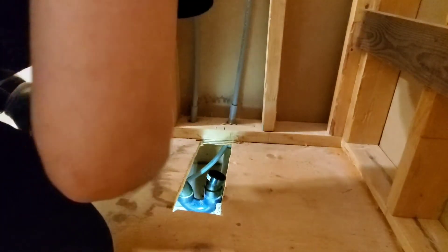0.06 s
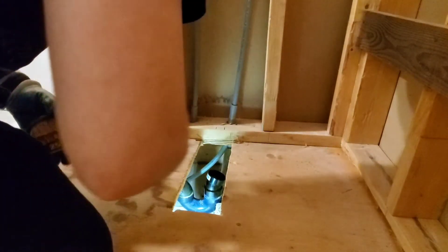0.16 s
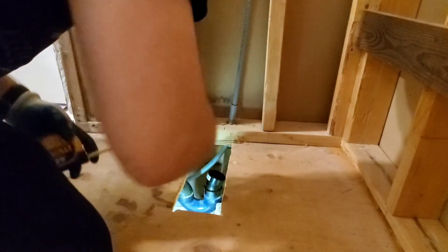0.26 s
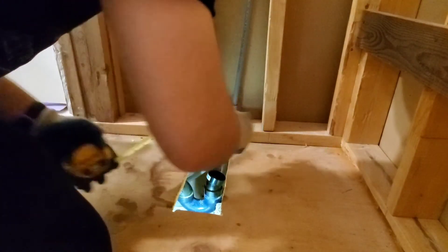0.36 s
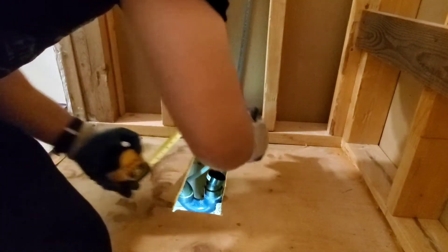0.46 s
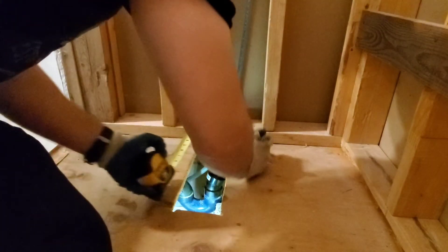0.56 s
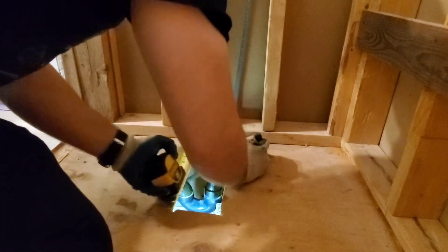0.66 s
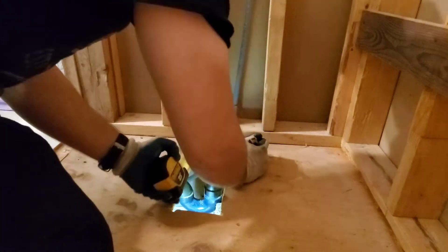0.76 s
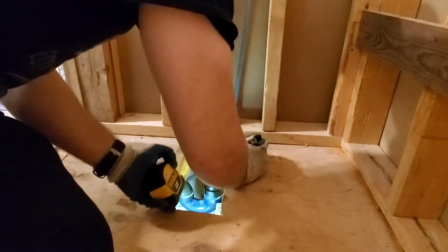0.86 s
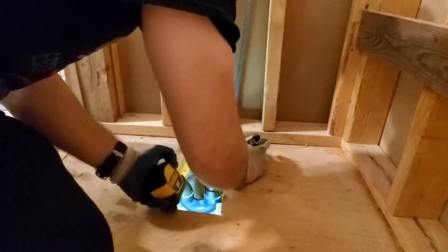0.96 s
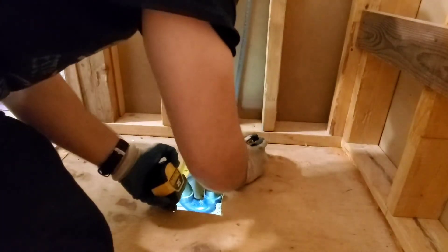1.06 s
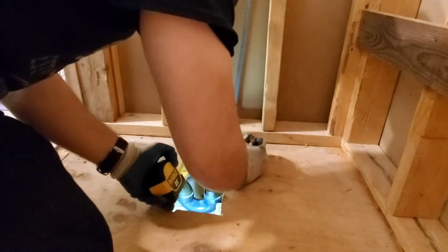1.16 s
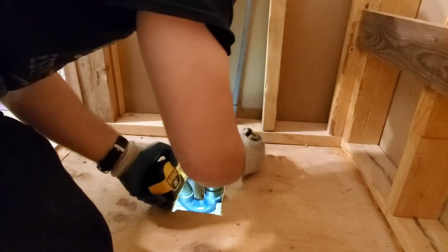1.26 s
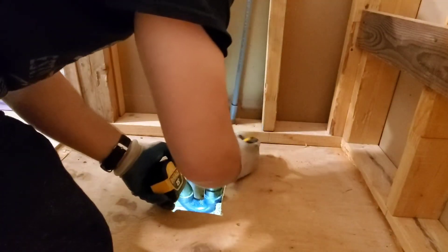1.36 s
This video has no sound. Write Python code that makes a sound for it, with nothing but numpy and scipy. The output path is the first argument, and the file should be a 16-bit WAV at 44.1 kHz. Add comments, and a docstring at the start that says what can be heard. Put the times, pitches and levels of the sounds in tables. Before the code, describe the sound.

A steel tape measure hisses out, then clicks and knocks against a plastic pipe.

```python
"""Over a low rumble and a soft rub of gloves, a steel tape measure hisses out of its case, close to
a pair of microphones in a bare timber-framed room. Friction makes the blade sing and drone, and it
buckles with a hollow bonk. Case and blade click, knock and ping on a plastic drain pipe and its
fitting, hands thump on the plywood floor, and the gloves rub on as the tape is held in place."""
import sys
import numpy as np
from scipy import signal
from scipy.fft import rfft, irfft
from scipy.io import wavfile

SR = 44100
rng = np.random.default_rng(int(sys.argv[2]) if len(sys.argv) > 2 else 0)


def bounce(signal):
    """Save signal as a 16-bit WAV file at the path given by the first command-line argument."""
    frames = np.transpose(np.atleast_2d(signal))
    limited = np.clip(frames, -1, 1)
    pcm = np.round(limited * 32767).astype(np.int16)
    wavfile.write(sys.argv[1], SR, pcm)


N = 63945
T = np.arange(N) / SR

# friction level of the blade leaving the case, following its speed (t/s, level/dB)
PULL = [(0, -67.5), (.075, -76.5), (.105, -52), (.15, -51.5), (.21, -45.5), (.26, -43.5), (.30, -41),
        (.375, -37), (.41, -43.5), (.465, -52), (.50, -80), (.56, -70), (.61, -60.5), (.66, -100)]
SLIDE_SLIPS_PER_S, SLIDE_SPREAD_DB = 4300, 0.5


def from_db(db):
    """Decibels to gain."""
    return 10 ** (np.asarray(db) / 20)


def unit_rms(x):
    """Scale to unit level."""
    return x / np.sqrt(np.mean(x ** 2) + 1e-20)


def level_curve(rows):
    """Gain that follows points of (t/s, level/dB)."""
    return from_db(np.interp(T, *np.transpose(rows)))


def at_hz(points, hz):
    """Read a table on a log-frequency axis."""
    f, value = np.transpose(points)
    return np.interp(np.log(hz + 1e-3), np.log(f), value)


def pan(db):
    """Microphone gains, the left one db above the right."""
    return from_db(np.array([[db], [-db]]) / 2)


def band(x, low_hz, high_hz, order=2):
    """Causal band-pass."""
    sos = signal.butter(order, [low_hz, min(high_hz, SR / 2 - 500)], "band", fs=SR, output="sos")
    return signal.sosfilt(sos, x)


def colour(x, spectrum, resonances=()):
    """Give an excitation a broad spectrum and a few resonances, at unit level."""
    hz = np.arange(N + 1) * SR / (2 * N)
    peaks_db = sum(db / (1 + (2 * (hz - f) / width) ** 2) for f, width, db in resonances)
    gain = from_db(at_hz(spectrum, hz) + peaks_db)
    return unit_rms(irfft(rfft(x, 2 * N) * gain)[..., :N])


def swell(middle, half_length, db):
    """Envelope that rises and falls smoothly."""
    return from_db(db) * np.exp(-((T - middle) / half_length) ** 2)


def decay(start, t60):
    """Envelope that jumps to one and dies away."""
    return (T >= start) * from_db(-60 * np.maximum(T - start, 0) / t60)


def crack(start, rise_s=0.0011, hold_s=0.003, t60_s=0.0093):
    """Envelope of one contact: quick rise, brief hold, fast release."""
    attack = np.clip((T - start) / rise_s, 0, 1)
    return attack * from_db(-60 * np.maximum(T - start - hold_s, 0) / t60_s)


def strike(start, modes):
    """Damped sines set off by one blow."""
    return sum(from_db(db) * decay(start, t60) * np.sin(2 * np.pi * hz * (T - start))
               for hz, db, t60 in modes)


def friction(slips_per_s, spread_db):
    """Dense tiny slips of uneven size, as each microphone gets them."""
    sizes = from_db(spread_db * np.minimum(rng.exponential(1, N), 4))
    slips = rng.random(N) < slips_per_s / SR
    return slips * sizes * rng.standard_normal((2, N))


def room(x, wet_db, gap_s=0.0011):
    """Add diffuse reflections from nearby studs and boards; the treble dies first."""
    # reverberation time of the bare room (f/Hz, t60/s)
    reverb_times = [(200, 0.47), (1000, 0.44), (3500, 0.34), (8000, 0.29), (15000, 0.32)]
    edges_hz = np.geomspace(180, 18000, 8)
    tail = 0
    for low, high in zip(edges_hz, edges_hz[1:]):
        t60 = at_hz(reverb_times, np.sqrt(low * high))
        tail += band(rng.standard_normal((2, N)), low, high) * decay(gap_s, t60)
    tail /= np.sqrt(np.sum(tail ** 2, axis=1, keepdims=True))
    return x + from_db(wet_db) * signal.fftconvolve(x, tail, axes=1)[:, :N]


def room_tone(side_db=1.5):
    """Low rumble of the building and faint hiss, wide across the pair."""
    # spectrum of the room tone (f/Hz, level/dB)
    spectrum = [(20, 4), (45, -12), (70, 5.5), (90, -3), (125, -11.5), (250, -18), (1000, -37), (4000, -50),
                (15000, -44)]
    # rise and fall of the rumble (t/s, level/dB)
    rumble = [(0, -71), (.1, -66.5), (.2, -55), (.5, -54.5), (.9, -66.5), (1.3, -68), (1.45, -48)]
    mid, side = colour(rng.standard_normal((2, N)), spectrum)
    return level_curve(rumble) * (mid + from_db(side_db) * side * [[1], [-1]])


def gloves():
    """Fabric rubs softly on the plastic of case and pipe, left of centre."""
    # rubbing level, following the pressure of the hands (t/s, level/dB)
    pressure = [(0, -58.5), (.06, -70), (.12, -70.5), (.25, -69), (.45, -53), (.58, -99), (.75, -54),
                (.86, -66), (.94, -60), (1.0, -48), (1.12, -44.5), (1.18, -57), (1.28, -50.5),
                (1.34, -60.5), (1.41, -60), (1.45, -69)]
    # spectrum of the rubbing (f/Hz, level/dB)
    spectrum = [(100, 12.5), (200, 4.5), (420, 6), (800, 0), (1400, -1), (3200, -4.5), (5000, -11),
                (8000, -21.5), (15000, -13)]
    # its low resonances (f/Hz, width/Hz, boost/dB)
    resonances = [(164, 59, 6.3), (354, 11, 12.8), (417, 24, 3.8)]
    rub = colour(friction(slips_per_s=2500, spread_db=-1.5), spectrum, resonances)
    return rub * level_curve(pressure) * pan(db=6.5)


def blade_slide():
    """The blade scrapes through the mouth of the case, and later shifts a little on the pipe."""
    # spectrum of the sliding steel (f/Hz, level/dB)
    spectrum = [(150, -27), (450, -9), (900, -2), (1400, -1), (2300, 3), (3500, 2.5), (4700, 0), (6000, -1),
                (8000, -6.5), (12500, 1.5), (15500, -3.5)]
    # brief shifts against the pipe (t/s, half length/s, level/dB)
    shifts = [(1.032, 0.05, -52), (1.279, 0.052, -58), (1.375, 0.021, -61)]
    level = level_curve(PULL) + sum(swell(*shift) for shift in shifts)
    scrape = colour(friction(SLIDE_SLIPS_PER_S, SLIDE_SPREAD_DB), spectrum) * level
    lows = signal.sosfilt(signal.butter(1, 3500, fs=SR, output="sos"), scrape)
    scrape += lows * (pan(db=5) - 1.5)  # the lows thin out, mostly at the right microphone
    return room(scrape * pan(db=1), wet_db=-2.5)


def blade_sings():
    """Friction excites one narrow resonance after another as the free length of the blade grows."""
    # passing resonances (t/s, half length/s, f/Hz, width/Hz, level/dB relative to the scrape)
    resonances = [(0.1, 0.16, 3150, 370, -3), (0.19, 0.08, 2120, 150, -7), (0.306, 0.023, 2900, 820, 1),
                  (0.4, 0.058, 3320, 200, -9.5), (0.371, 0.012, 5330, 120, -6)]
    singing = 0
    for t, half_length, hz, width, db in resonances:
        ring = band(friction(SLIDE_SLIPS_PER_S, SLIDE_SPREAD_DB), hz - width / 2, hz + width / 2)
        singing += unit_rms(ring) * swell(t, half_length, db)
    return singing * level_curve(PULL) * pan(db=5.5)


def fitting_clicks(shared_power=0.15, right_lag_samples=4):
    """Blade and case tick on the fitting: cracks of a few milliseconds, each with its own brightness."""
    # contacts (t/s, body level/dB, mid level/dB, upper level/dB, top level/dB, left over right/dB)
    contacts = [(0.084, -66.5, -61, -75, -62, 16), (0.0978, -75, -53, -51.5, -48.5, 14.5),
                (0.442, -50.5, -46, -50.5, -45, 18), (.465, -45, -38.5, -47, -49.5, 6),
                (0.515, -49, -56, -55, -44, 8.5), (.619, -57, -45, -51, -45.5, 14.5),
                (0.6327, -37, -36, -40.5, -36, 7.5), (.788, -58, -43, -38, -35.5, 11),
                (0.882, -62.5, -55.5, -48, -60, 21), (0.887, -58, -44.5, -44, -43, 7),
                (.969, -75, -47.5, -50.5, -47.5, 11.5), (0.985, -71, -48, -70, -48.5, 4),
                (1.023, -71, -37.5, -37, -31, 10.5), (1.046, -47, -36.5, -44, -57, 10),
                (1.0534, -48, -37.5, -34.5, -27, 9.5)]
    # body, mid, upper and top bands of a click (low f/Hz, high f/Hz)
    bands = [(350, 1800), (2300, 3900), (4200, 7300), (9000, 17000)]
    # added balance of each band (left over right/dB)
    band_pan_db = [-2.5, -1.5, -9.5, -8]
    clicks = np.zeros((2, N))
    for k, (low, high) in enumerate(bands):
        common = rng.standard_normal(N)
        noise = np.sqrt(shared_power) * np.array([common, np.roll(common, right_lag_samples)])
        noise += np.sqrt(1 - shared_power) * rng.standard_normal((2, N))
        level = sum(from_db(band_db[k]) * pan(pan_db) * crack(t) for t, *band_db, pan_db in contacts)
        clicks += unit_rms(band(noise, low, high, order=3)) * level * pan(band_pan_db[k])
    return room(clicks, wet_db=-0.5)


def blade_drone():
    """Smooth friction drives the low bending resonances of the extended blade."""
    # hollow drone as the blade bows and rubs (t/s, level/dB)
    bowing = [(0, -82), (.09, -70), (.145, -52.5), (.20, -53.5), (.29, -64.5), (.31, -43.5), (.355, -47),
              (.40, -56), (.47, -50), (.56, -95), (.62, -98)]
    # spectrum of the drone (f/Hz, level/dB)
    spectrum = [(200, -37), (330, -22), (430, 1), (700, -2.5), (950, -15), (1600, -26)]
    # bending resonances (f/Hz, width/Hz, boost/dB)
    resonances = [(373, 17, 14), (410, 23, 1), (469, 23, 5), (656, 37, 4)]
    return colour(rng.standard_normal((2, N)), spectrum, resonances) * level_curve(bowing) * pan(db=5)


def floor_thumps():
    """Soft pushes set the plywood booming; a longer contact is duller."""
    # weight coming down on the floor (t/s, level/dB, contact length/s)
    thumps = [(.175, -55, 0.0059), (0.471, -53, 0.0041), (0.627, -56, 0.0018), (0.65, -70, 0.0049),
              (.727, -54, 0.0028), (.777, -46.5, 0.0066), (0.9563, -42.5, 0.0043), (.968, -37, 0.0054),
              (0.982, -41.5, 0.0033), (1.056, -37, 0.0011), (1.066, -42, 0.003), (1.131, -47.5, 0.0043)]
    # modes of the floor (f/Hz, level/dB, t60/s)
    modes = [(67.5, 3, 0.37), (134, -14, 0.3), (160.5, -2, 0.25), (238, -7, 0.15)]
    boom = 0
    for t, db, contact_s in thumps:
        push = np.sin(np.pi * np.minimum(T / contact_s, 1))
        boom += from_db(db) * signal.fftconvolve(strike(t, modes), push / push.sum())[:N]
    return boom * pan(db=6.5)


def blade_buckles():
    """The thin curved blade snaps through with a hollow bonk, well to the left."""
    # buckles and wobbles back (t/s, level/dB, pitch ratio)
    buckles = [(.305, -30.5, 1), (.336, -41, 0.95), (.352, -42, 1), (1.061, -37.5, 0.97)]
    # modes of the buckling blade (f/Hz, level/dB, t60/s)
    modes = [(365, -12, 0.61), (426, -3, 0.092), (481, -4, 0.053), (636, -18, 0.07), (853, -9.5, 0.02)]
    bonks = 0
    for t, db, pitch in buckles:
        tuned = [(hz * pitch, level, t60) for hz, level, t60 in modes]
        bonks += from_db(db) * strike(t, tuned)
    return room(band(bonks, 375, 1840, order=3) * pan(db=10.5), wet_db=-4.5)


def sleeve_brushes():
    """Soft, low puffs of cloth as the arm moves, centred between the microphones."""
    # passes of the sleeve (t/s, half length/s, level/dB)
    brushes = [(0.33, 0.018, -58), (.365, 0.013, -50), (1.244, 0.016, -61)]
    cloth = unit_rms(band(rng.standard_normal(N), low_hz=154, high_hz=227))
    return cloth * sum(swell(*brush) for brush in brushes)


def blade_catches():
    """The blade's edge catches in the case: thin, dry ticks close to the microphones."""
    # catches of the edge (t/s, level/dB)
    catches = [(0.407, -44), (.444, -41), (.465, -43), (.5145, -37.5)]
    hiss = unit_rms(band(rng.standard_normal((2, N)), low_hz=13500, high_hz=17000))
    level = sum(from_db(db) * crack(t) for t, db in catches)
    return room(hiss * level * pan(db=8), wet_db=-19)


def pipe_knock(crack_boost_db=2.5, clatter_t60_s=0.2):
    """The plastic pipe cracks hard and rings under the case, and its fitting clatters."""
    # blow of the case on the pipe (t/s, level/dB)
    knocks = [(0.6326, -36)]
    # modes of pipe and fitting (f/Hz, level/dB, t60/s)
    modes = [(119, -26, 0.24), (216, -16, 0.13), (314, -5.5, 0.12), (732, -10, 0.23), (840, -10.5, 0.13),
             (1020, -16, 0.41), (1627, -0.5, 0.1), (2786, -3, 0.028), (3270, 0.5, 0.033), (3970, -11, 0.05)]
    # dull clatters of the fitting (t/s, level/dB)
    clatters = [(0.63, -38), (0.653, -41.5), (1.061, -37)]
    # spectrum of the clatter (f/Hz, level/dB)
    spectrum = [(80, -0.5), (125, 10), (220, -5), (370, 4.5), (520, -8.5), (830, -1.5), (1400, -11),
                (2500, -8.5), (5000, -18.5)]
    ring = sum(from_db(db) * strike(t, modes) for t, db in knocks)
    impact = unit_rms(band(rng.standard_normal(N), low_hz=3020, high_hz=3920, order=5))
    impact *= sum(from_db(db + crack_boost_db) * crack(t) for t, db in knocks)
    clatter = colour(friction(slips_per_s=4000, spread_db=-0.2), spectrum)
    clatter *= sum(from_db(db) * decay(t, clatter_t60_s) for t, db in clatters)
    return room((ring + impact + clatter) * pan(db=6), wet_db=-5)


def hook_tap():
    """The small steel hook at the end of the blade pings, with more room than direct sound."""
    # tap on the fitting (t/s, level/dB)
    taps = [(0.789, -39)]
    # modes of the hook (f/Hz, level/dB, t60/s)
    modes = [(1658, -5, .012), (2223, -10, .012), (3010, 0, .013), (3940, -1, .011)]
    ping = sum(from_db(db) * strike(t, modes) for t, db in taps)
    return room(ping * pan(db=5.5), wet_db=3)


def blade_snaps():
    """The blade snaps against the fitting and rings, short and bright."""
    # blows on the fitting (t/s, level/dB)
    snaps = [(1.0215, -46), (1.0531, -30)]
    # modes of the steel (f/Hz, level/dB, t60/s)
    modes = [(3050, -7, 0.034), (3670, -2, 0.029), (4427, 2, 0.023), (4690, -10.5, 0.033), (5330, 1, 0.021)]
    ring = sum(from_db(db) * strike(t, modes) for t, db in snaps)
    return room(ring * pan(db=4.5), wet_db=-0.5)


def scene():
    """All sources at the two microphones, with the work mostly to the left."""
    tape = blade_slide() + blade_sings() + blade_drone()
    tape += blade_catches() + blade_buckles() + blade_snaps() + hook_tap()
    handling = gloves() + sleeve_brushes() + fitting_clicks() + pipe_knock() + floor_thumps()
    return tape + handling + room_tone()


def record(dry):
    """A closely spaced pair shares the bass; the deepest bass rolls off and the top is cut steeply."""
    shared_below_hz, bass_side_db = 354, -13
    low_cut_hz, high_cut_hz = 61, 15950
    mid, side = (dry[0] + dry[1]) / 2, (dry[0] - dry[1]) / 2
    upper_side = signal.sosfiltfilt(signal.butter(3, shared_below_hz, "high", fs=SR, output="sos"), side)
    side = upper_side + from_db(bass_side_db) * (side - upper_side)
    pair = mid + side * [[1], [-1]]
    pair = signal.sosfilt(signal.butter(2, low_cut_hz, "high", fs=SR, output="sos"), pair)
    return signal.sosfilt(signal.ellip(10, .3, 80, high_cut_hz, fs=SR, output="sos"), pair)


dry = scene()
out = record(dry)
bounce(out)
```